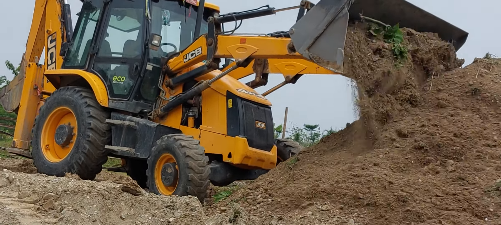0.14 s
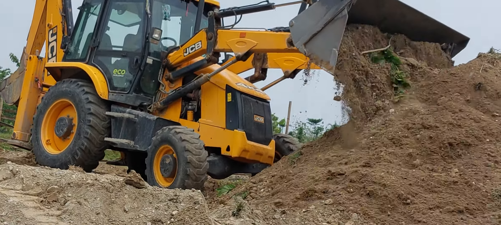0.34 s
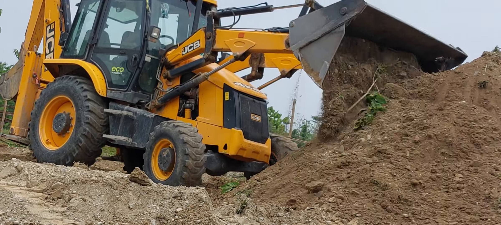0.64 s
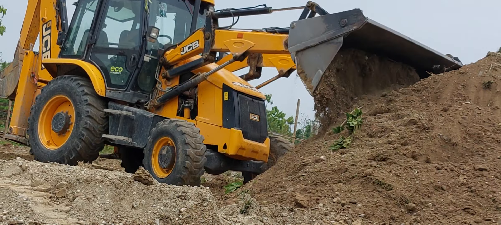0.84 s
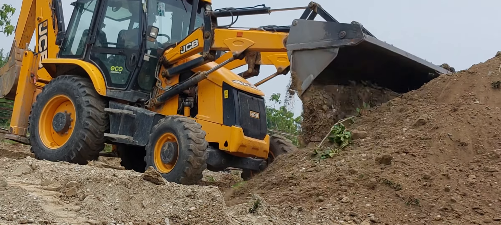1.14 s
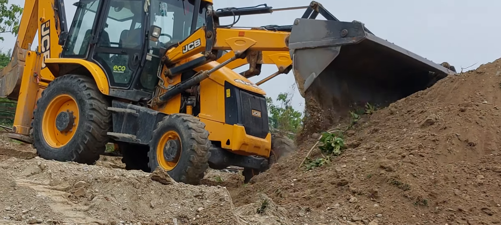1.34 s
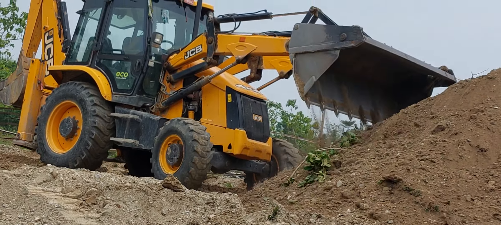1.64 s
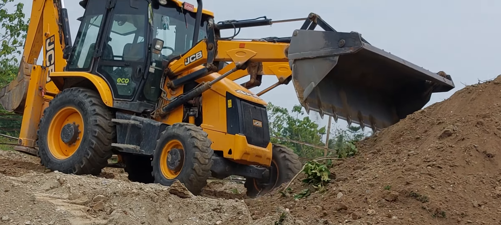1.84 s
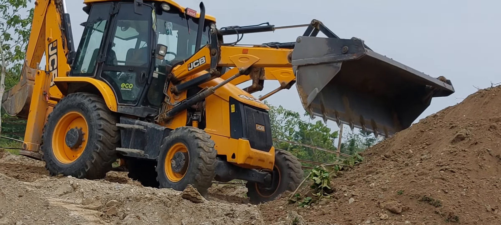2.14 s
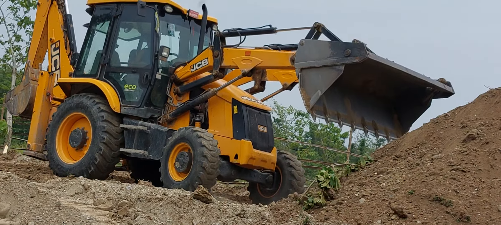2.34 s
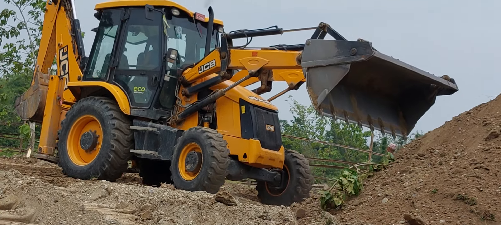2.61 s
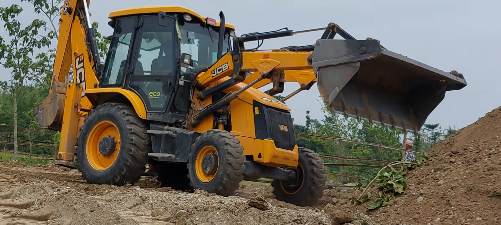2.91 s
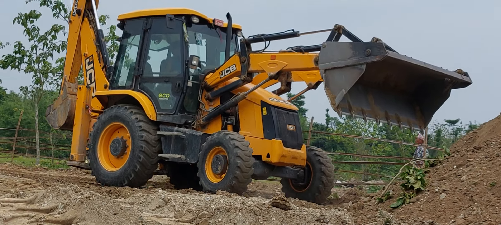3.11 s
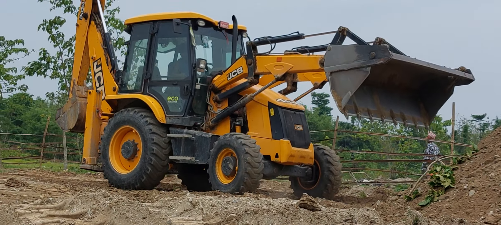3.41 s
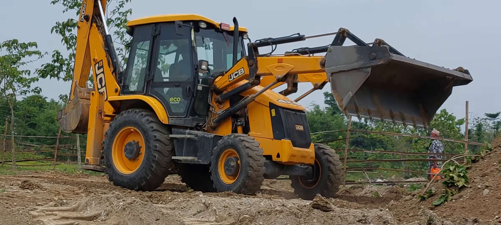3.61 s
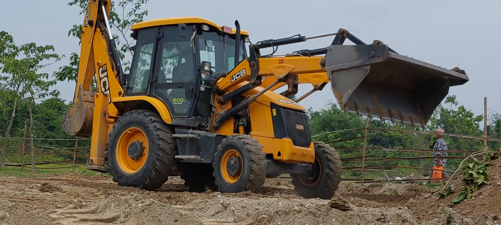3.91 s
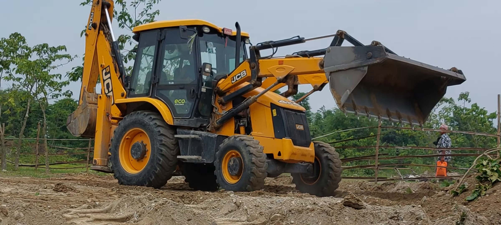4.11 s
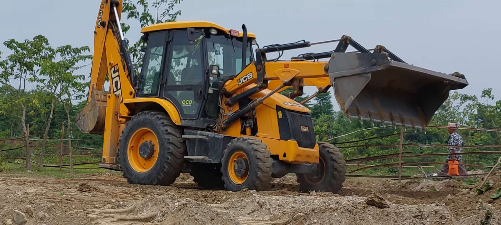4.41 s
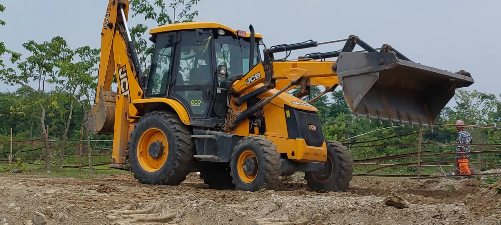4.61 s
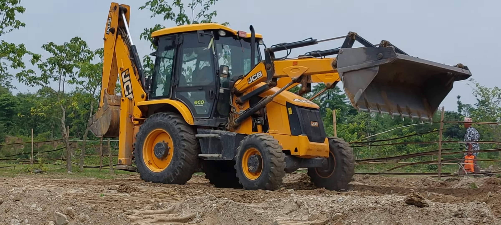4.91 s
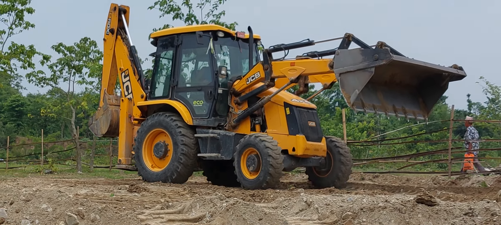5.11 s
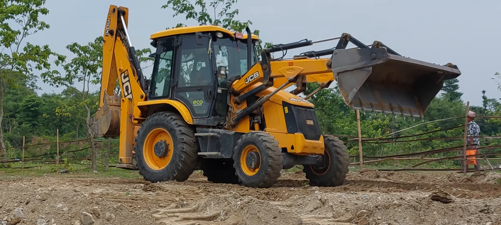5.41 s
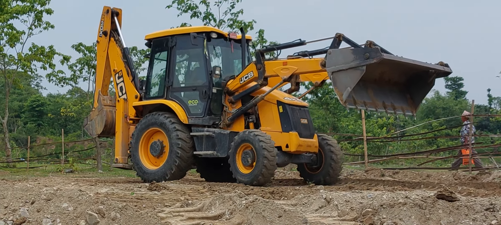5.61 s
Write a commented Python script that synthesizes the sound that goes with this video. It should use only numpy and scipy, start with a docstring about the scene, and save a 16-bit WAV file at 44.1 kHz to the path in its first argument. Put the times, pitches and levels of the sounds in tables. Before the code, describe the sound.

A nearby diesel loader idles outdoors with a low, pulsing chug, ticking clatter and a faint high whistle. From the start, soil slides from its steel bucket in a gritty hiss with a light scrape, strongest around 0.4 seconds and thinning out by 2 seconds. Stones and pins click and clank on steel, most clearly at 0.3, 0.4 and 1.6 seconds. At about 2 seconds the engine revs up with a louder exhaust bark, a brief rush of air and a run of hard knocks, reaching double its idle speed by 3 seconds. The thin turbo whistle glides up very high and stays there. The engine holds high, slightly wavering revs, growing only a little quieter as the machine backs away and its sound shifts between left and right. More metal clanks come at 4.1 and 4.3 seconds, and the engine runs on until the end, near 5.7 seconds.

```python
"""A four-cylinder diesel loader idles outdoors while soil slides from its bucket, revs up and backs away.
Each firing drives a pressure pulse through the exhaust pipe, excites the resonances of block and panels
and puffs the turbocharger whistle. Injectors tick, and pins and stones clank on steel.
Two microphone ports hear the machine from a slowly turning bearing."""
import sys
import numpy as np
from scipy import signal
from scipy.fft import rfft, irfft
from scipy.io import wavfile
from scipy.ndimage import uniform_filter1d

SR = 44100
rng = np.random.default_rng(int(sys.argv[2]) if len(sys.argv) > 2 else 0)


def log_audio(samples):
    """Write samples as a 16-bit WAV file to the path given in sys.argv[1]."""
    # one column per channel
    frames = np.atleast_2d(samples).T
    # limit to full scale, then quantise
    limited = np.clip(frames, -1, 1)
    pcm = np.round(limited * 32767).astype(np.int16)
    wavfile.write(sys.argv[1], SR, pcm)


N = 253575
T = np.arange(N) / SR
IDLE_PER_S, LOUD_PER_S, FULL_PER_S = 29.705, 42.6, 61.503  # firing rates: idle, working level, governed
THROTTLE_S, BACKING_S = 1.969, 2.77  # the pedal goes down; the machine starts to recede

# Modes of the engine panels. Each row: frequency in Hz, bandwidth in Hz, relative level in dB.
PANEL_MODES = [(674, 34, -21), (970, 78, -10.5), (1243, 54, -6), (1666, 41, -12), (2482, 23, -27.5),
               (2984, 49, -18)]


def amp(db):
    """Amplitude ratio of a level in decibels."""
    return 10 ** (np.asarray(db) / 20)


def unit_rms(x):
    """Normalisation to an rms of 1."""
    return x / np.sqrt(np.mean(x ** 2) + 1e-20)


def curve(rows, at, column=1, scale=lambda v: v):
    """Linear interpolation of one table column against the first."""
    rows = np.asarray(rows, float)
    return np.interp(scale(at), scale(rows[:, 0]), rows[:, column])


def coloured(x, rows, column=1):
    """Spectral shaping by a dB curve over log frequency, cut off below its first row; rms 1."""
    hz = np.fft.rfftfreq(N, 1 / SR)
    low_cut = np.clip(2 * hz / rows[0][0] - 1, 0, 1) ** 2
    return unit_rms(irfft(rfft(x) * low_cut * amp(curve(rows, hz, column, np.log1p)), N))


def resonate(x, hz, width_hz):
    """A damped resonator of gain 1 at a steady or gliding frequency."""
    phasor = np.exp(2j * np.pi * np.cumsum(hz * np.ones(x.shape[-1])) / SR)
    pole = np.exp(-np.pi * width_hz / SR)
    return 2 * (phasor * signal.lfilter([1 - pole], [1, -pole], x / phasor)).real


def wander(width_hz, count):
    """Slow random fluctuations: low-passed noise of rms 1."""
    pole = np.exp(-np.pi * width_hz / SR)
    return unit_rms(signal.lfilter([1 - pole], [1, -pole], rng.standard_normal((count, N))))


def puffs(firings, depth, lag, spread_db):
    """Amplitude modulation of rms 1: one swell of random strength a firing, delayed by lag cycles."""
    strengths = amp(spread_db * rng.uniform(-2.0, 1, int(firings[-1]) + 2))
    swell = np.exp(depth * (np.cos(2 * np.pi * (firings - lag)) - 1))
    envelope = 1 + swell * strengths[(firings - lag + .5).astype(int)] * depth
    return envelope / np.sqrt(uniform_filter1d(envelope ** 2, SR // 4))


def firing_rate(run_up_s=1.174, surge_s=.195):
    """The fundamental in Hz: idle, then a quarter-sine climb to governed speed, with brief surges."""
    # The governor hunts as the load changes. Each row: time in seconds, change of rate in Hz.
    surges = [(.26, -2.146), (1.257, -.789), (3.067, 1.599), (4.301, 2.246), (4.84, -.827), (5.188, 1.137)]
    run_up = np.sin(np.pi / 2 * np.clip((T - THROTTLE_S) / run_up_s, 0, 1))
    hunting = sum(change * np.exp(-((T - s) / surge_s) ** 2) for s, change in surges)
    return IDLE_PER_S + (FULL_PER_S - IDLE_PER_S) * run_up + hunting


def engine_gain(rate, idle_db, working_db, fade_db_per_s):
    """Radiation grows with speed to a working level; spreading loss lowers it as the machine recedes."""
    effort = np.clip((rate - IDLE_PER_S) / (LOUD_PER_S - IDLE_PER_S), 0, 1)
    return amp(idle_db + (working_db - idle_db) * effort - fade_db_per_s * np.maximum(T - BACKING_S, 0))


def soil_and_air():
    """Granular noise: dense tiny impacts and sparse stones merge into a hiss and ring the bucket lip."""
    # The gritty hiss: sliding soil until 2 s, then a rush of air as the engine revs up.
    # Each row: time in seconds, level in dB.
    hiss_level = [(0.0, -53), (0.4, -45), (2.03, -65), (2.1, -49), (2.5, -53), (2.9, -80)]
    # Spectrum of the hiss. Each row: frequency in Hz, relative density in dB.
    grit = [(2000, -3), (3500, -8.5), (5500, -11), (8000, -16.5), (12000, -8), (15500, -18)]
    # Soil scraping over the lip. Each row: time in seconds, level in dB.
    scrape = [(0, -76), (.15, -60), (.6, -55), (.75, -94)]
    grains = amp(0.83 * np.minimum(rng.exponential(1, N), 5)) * (rng.random(N) < 2500 / SR)
    stones = amp(11 + 3 * np.minimum(rng.exponential(1, N), 3)) * (rng.random(N) < 18 / SR)
    impacts = signal.lfilter([1], [1, -.96], grains + stones) * rng.standard_normal((2, N))
    lip = amp(curve(scrape, T)) * unit_rms(resonate(impacts, 4000, 250))
    return amp(curve(hiss_level, T)) * coloured(impacts, grit) + lip


def clanks():
    """Impacts of pins and stones on steel: bursts of band-limited noise that decay exponentially."""
    # Each row: start in seconds, level in dB, centre in Hz, bandwidth in Hz, 60 dB decay time in seconds.
    blows = [(.057, -35, 7500, 3000, 0.016), (.2997, -26.5, 5070, 2500, 0.017),
             (.4125, -26.5, 2270, 2400, 0.037), (.6818, -34, 1970, 1600, 0.11),
             (1.1613, -33, 2280, 1300, 0.11), (1.279, -33, 11900, 5000, .02),
             (1.6472, -25, 1160, 796, 0.069), (1.6472, -33.5, 2180, 1200, 0.086),
             (4.0936, -25, 1780, 2980, 0.082), (4.272, -29.5, 4430, 2970, 0.13),
             (4.2752, -25, 1280, 900, 0.12)]
    out = np.zeros((2, N))
    t = np.arange(SR // 8) / SR
    for s, db, hz, width, t60 in blows:
        noise = rng.standard_normal((2, len(t)))
        band = unit_rms(resonate(resonate(noise, hz, width), hz, width))
        attack = np.minimum(t / (t60 / 30), 1)  # longer-ringing blows build up more slowly
        out[:, round(s * SR):][:, :len(t)] += band * amp(db - 60 * t / t60) * attack
    return out


def injectors(firings, state, snap_s=.007):
    """Impulse excitation: each injection, of uneven strength, gives a short ring and a treble snap."""
    ring_db, snap_db = (-53.5, -48, -60.5), (-57, -43, -60)  # idling, pulling, revving
    count = np.floor(firings + .1).astype(int)
    ticks = np.diff(count, prepend=count[0]) * amp(2.5 * rng.standard_normal(count[-1] + 1))[count]
    ringing = unit_rms(resonate(ticks, hz=2520, width_hz=80))
    bright = np.diff(rng.standard_normal((2, N + 1)))
    snap = signal.lfilter([1], [1, -np.exp(-1 / (snap_s * SR))], ticks) * bright
    snap = signal.sosfilt(signal.butter(2, 2000, "high", fs=SR, output="sos"), snap)
    easing_db = -8.0 * np.maximum(T - THROTTLE_S, 0) * state[1]  # hardest just after the pedal goes down
    return amp(np.dot(ring_db, state)) * ringing + amp(np.dot(snap_db, state) + easing_db) * snap


def turbo_whistle(firings, state):
    """A gliding tone, pulsed by the exhaust and reinforced as it passes the intake duct's resonances."""
    # Pitch of the whistle. Each row: time in seconds, frequency in Hz.
    pitch = [(0, 7400), (.7, 7370), (1.2, 6760), (1.62, 6610), (2.02, 6500), (2.11, 6770), (2.36, 8470),
             (2.8, 12100), (3.1, 13500), (3.45, 14200), (4.05, 14670), (4.3, 14460), (4.65, 14160),
             (5.05, 14410), (5.44, 14220), (5.75, 14050)]
    # Duct modes. Each row: centre in Hz, half-width in Hz, lift in dB spooling up and running down.
    duct_modes = [(6678, 116, 20, 22), (7000, 283, 10, 15.5), (7460, 290, 10, 0), (11950, 300, 12, 0),
                  (14320, 55, -1, 13)]
    whistle_db = (-73, -56, -53)  # idling, pulling, revving
    idling, pulling, revving = state
    hz = curve(pitch, T)
    airy = unit_rms(resonate(resonate(rng.standard_normal(N), hz, 280), hz, 280))
    tone = np.sqrt(2) * np.cos(2 * np.pi * np.cumsum(hz + 70 * wander(29.3, count=1)[0]) / SR)
    whistle = (0.62 * idling + 0.39 * revving) * tone + (0.2 + 0.64 * pulling) * airy
    rising = uniform_filter1d(1. * (np.gradient(hz) > 0), SR // 20)
    lift_db = sum((up_db * rising + down_db * (1 - rising)) * np.exp(-((hz - centre) / half) ** 2)
                  for centre, half, up_db, down_db in duct_modes)
    whistle *= amp(np.dot(whistle_db, state) + lift_db)
    whistle *= puffs(firings, 6.0 - 4.5 * revving, lag=-0.064, spread_db=2.0)
    return whistle * np.array([[1], [.3]])  # a narrow beam, weak in the scattered sound


def intake_hiss(firings, state):
    """Broadband flow noise with an airbox resonance, pulsing while the engine idles or pulls."""
    idling, pulling, _ = state
    air = rng.standard_normal((2, N))
    airbox = amp(-12) * unit_rms(resonate(air, 12200, 550))
    hiss = unit_rms(resonate(air, 10300, 4900)) + airbox
    draw = 0.51 * idling + uniform_filter1d(pulling, SR // 3, origin=SR // 10)
    return amp(-51.5) * draw * hiss * puffs(firings, 1.6, lag=-0.06, spread_db=5.0)


def knocks(t60=0.033, attack_s=0.003):
    """Free vibration: the hardest combustion knocks leave the third panel mode ringing briefly."""
    # Each row: start in seconds, level in dB.
    hard_firings = [(1.3715, -33), (1.4396, -29), (2.075, -29), (2.1846, -21), (2.282, -17.5),
                    (2.3254, -21), (2.4536, -19), (2.532, -24), (2.7544, -16), (2.8876, -21)]
    out = np.zeros(N)
    t = np.arange(SR // 10) / SR
    for s, db in hard_firings:
        hz = PANEL_MODES[2][0] * rng.uniform(0.96, 1.02)
        envelope = amp(db - 60 * t / t60) * np.minimum(t / attack_s, 1)
        out[round(s * SR):][:len(t)] += np.sin(2 * np.pi * hz * t) * envelope
    return out


def clatter(firings, rate, state):
    """Forced vibration: valve gear and combustion shake the block and panel modes at each firing."""
    # Spectrum of the block. Each row: frequency in Hz, relative density in dB idling and revving.
    spectrum = [(466, 8.5, -5.5), (810, -14.5, -2), (925, 6, 4), (1310, 2, 3.5), (1840, 3, 3),
                (2160, -10.5, -3), (2480, -0.5, -6), (2900, -3, -1.5), (4500, -10.5, -12),
                (5960, -17.5, -14.5), (7100, -10.5, -13), (8570, -26, -20), (11300, -15, -22),
                (15500, -23, -16)]
    idling, pulling, revving = state
    swell = puffs(firings, 0.17 * idling + 0.26 * pulling + 0.097, lag=-0.13, spread_db=10.0)
    noise = rng.standard_normal((2, 2, N)) * swell
    block = np.sqrt(1 - revving) * coloured(noise[0], spectrum)
    block += np.sqrt(revving) * amp(0.5) * coloured(noise[1], spectrum, column=2)
    panels = np.zeros((2, N))
    for hz, width, db in PANEL_MODES:
        force = puffs(firings, 3.0 - 0.3 * revving, lag=-0.049, spread_db=4.5)
        panels += amp(db) * unit_rms(resonate(rng.standard_normal((2, N)) * force, hz, width))
    gain = engine_gain(rate, idle_db=-41, working_db=-33, fade_db_per_s=.45)
    # the knock is hardest while the engine pulls
    return gain * (block * amp(-3.0 * pulling) + panels * amp(2.2 * pulling - 2.6 * revving))


def exhaust_fundamental(firings, rate, knee_hz=51, db_per_octave=32):
    """The lowest order: radiation is poor at low speed; fuelling swells it as the engine gains speed."""
    octaves = np.minimum(np.log2(rate / knee_hz), 0)
    fuelling_db = 14 * np.tanh(np.gradient(rate) * SR / 34)
    return np.sqrt(2) * amp(-34 + db_per_octave * octaves + fuelling_db) * np.cos(2 * np.pi * firings)


def exhaust(firings, rate, state, bark_lag_s=0.076):
    """Periodic pressure pulses radiate wavering engine orders, with turbulence coloured by the pipe."""
    # Each row: multiple of the firing rate, relative level in dB idling, pulling and revving.
    orders = [(2, -14, -5, -13), (3, -11, -4.5, -14), (4, -15, -10, -18.5), (5, -8.5, -20, -18.5),
              (6, -11.5, -15, -22), (3.5, -12, -12, -12.5), (5.3, -42, -15, -20)]
    # Pipe spectra at idle and at speed. Each row: frequency in Hz, relative density in dB.
    pipe_idle = [(24, -55), (40, -23.5), (75, -8.5), (183, 0.5), (204, -6), (296, -8), (385, -12.5),
                 (507, -29.5), (651, -29), (700, -21), (910, -39), (1540, -120)]
    pipe_revs = [(24, -38), (40, -20), (65, -8), (86, -8), (123, 2.5), (160, 0.5), (222, 2.5), (269, -4),
                 (333, 0), (700, -26), (910, -25), (1540, -120)]
    # Relative level of the turbulence in dB: idling, pulling, revving.
    turbulence_db = [-3, -5, 0]
    idling = state[0]
    drift = wander(4.9, count=len(orders))
    thump = np.zeros(N)
    for i, (multiple, *db) in enumerate(orders):
        phase = 2 * np.pi * multiple * firings + 0.27 * drift[i - 1]
        thump += np.sqrt(2) * amp(np.dot(db, state) + 1.26 * drift[i]) * np.cos(phase)
    air = rng.standard_normal((2, 2, N)) * puffs(firings, 0.59 * idling + 0.35, lag=0.032, spread_db=0.5)
    turbulence = np.sqrt(idling) * coloured(air[0], pipe_idle)
    turbulence += np.sqrt(1 - idling) * coloured(air[1], pipe_revs)
    bark = amp(4 * (T > THROTTLE_S + bark_lag_s) * np.sqrt(idling))  # the first full charge has burnt
    gain = bark * engine_gain(rate, idle_db=-29, working_db=-20, fade_db_per_s=0.95)
    return gain * (thump + amp(np.dot(turbulence_db, state)) * turbulence)


def scene():
    """Superposition of the sources in two rows: direct sound, and what ground and heap scatter."""
    rate = firing_rate()
    firings = .03 + np.cumsum(rate) / SR  # phase in firing cycles
    idling = np.clip((37 - rate) / 6, 0, 1)
    revving = np.clip((uniform_filter1d(rate, SR // 4) - 52) / 10.27, 0, 1)
    pulling = 1 - idling - revving
    state = np.array([idling, pulling, revving])
    pipe = exhaust(firings, rate, state) + exhaust_fundamental(firings, rate)
    block = clatter(firings, rate, state)
    turbo = turbo_whistle(firings, state) + intake_hiss(firings, state)
    return pipe + block + turbo + injectors(firings, state) + knocks() + soil_and_air() + clanks()


def record(dry, cutoff_hz=15720):
    """Acoustic shadow: the right port hears the left's sound phase-shifted, shaded and with scatter."""
    # The machine's path. Each row: time in seconds, bearing (0 at the heap, 1 backing, 2 or more ahead).
    path = [(0, 0.33), (2.3, 0.33), (3.2, 0.79), (4.1, 1.13), (4.8, 1.77), (5.75, 2.6)]
    # Shadow of the housing. Each row: frequency in Hz, right against left in dB at bearings 0, 1 and 2.
    shadow = [(100, 0, 1, 0.0), (734, 1, -1, 1), (1250, 1.5, 0, -4), (1900, 8, -17.5, -2),
              (2230, 10, -5, -1.5), (3570, -16.5, -4, 9), (3720, -0.5, 4, 10), (4520, -0.5, 12, 5),
              (5420, 11, 7, -5.5), (6150, 15, -4, -14.0), (6880, -0.5, -24, -17), (9150, -12, -9, -9),
              (11400, 1.5, -2, -5), (15100, -1, -13, -12)]
    # Phase lead of the left port. Each row: frequency in Hz, radians from the side and from ahead.
    phase_lead = [(0, 0, 0), (1200, 1.4, .5), (2050, 2.8, .3), (2200, -2.4, .3), (2900, -.5, .5),
                  (3800, -.2, 1.6), (6400, 5.4, 5.7), (10000, 8.7, 8.3), (16000, 15.7, 15.5)]
    # Likeness of the ports. Each row: frequency in Hz, weight of the direct sound from 0 to 1.
    coherence = [(60, .98), (350, .96), (1200, .9), (3000, .78), (5500, .58), (8000, .42), (15000, .45)]
    hz, t, (direct, scatter) = signal.stft(dry, SR, nperseg=1024, noverlap=768)
    bearing = np.clip(curve(path, t), 0, 2)
    share = [np.maximum(1 - abs(bearing - k), 0) for k in range(3)]
    shadow_db = sum(np.outer(curve(shadow, hz, k + 1, np.log1p), share[k]) for k in range(3))
    lead = np.outer(curve(phase_lead, hz), 1 - share[2]) + np.outer(curve(phase_lead, hz, 2), share[2])
    alike = curve(coherence, hz, scale=np.log1p)[:, None]
    right = amp(shadow_db) * np.exp(-1j * lead) * (alike * direct + np.sqrt(1 - alike ** 2) * scatter)
    ports = np.array([dry[0], signal.istft(right, SR, nperseg=1024, noverlap=768)[1][:N]])
    ports = signal.sosfilt(signal.butter(2, 30, "high", fs=SR, output="sos"), ports)  # bass roll-off
    ports = .7 * np.tanh(ports / .7)  # the preamplifier rounds the highest peaks
    low_pass = signal.firwin(1023, cutoff_hz, window=("kaiser", 9), fs=SR)
    return signal.oaconvolve(ports, low_pass[None], "same")


dry = scene()
out = record(dry)
log_audio(out)
```